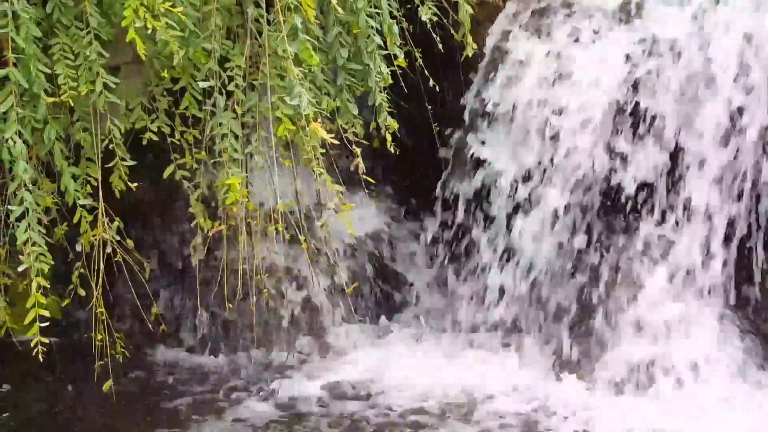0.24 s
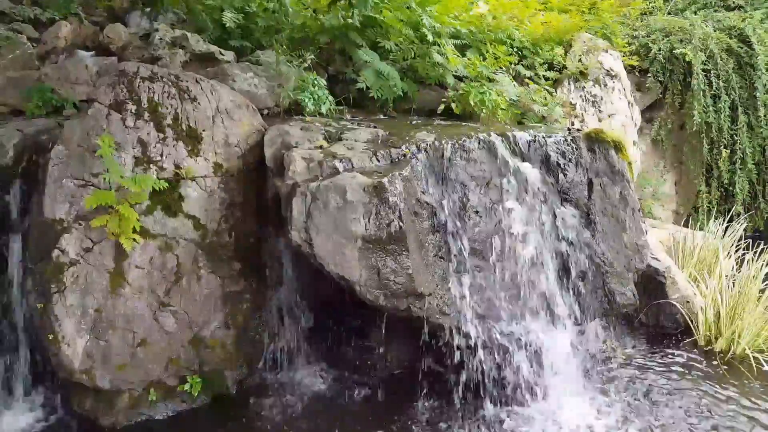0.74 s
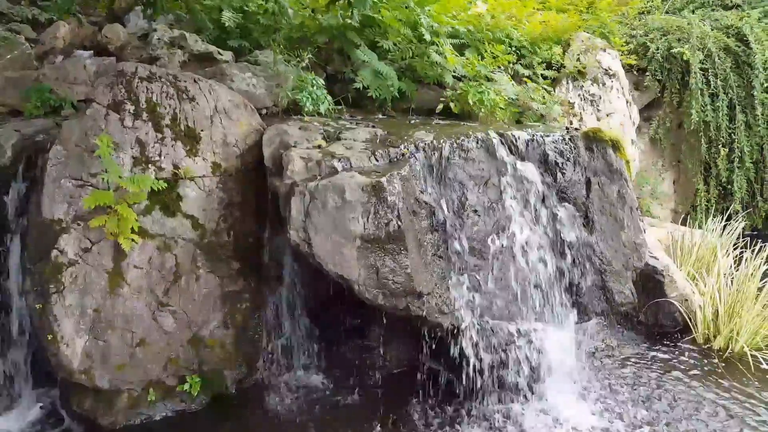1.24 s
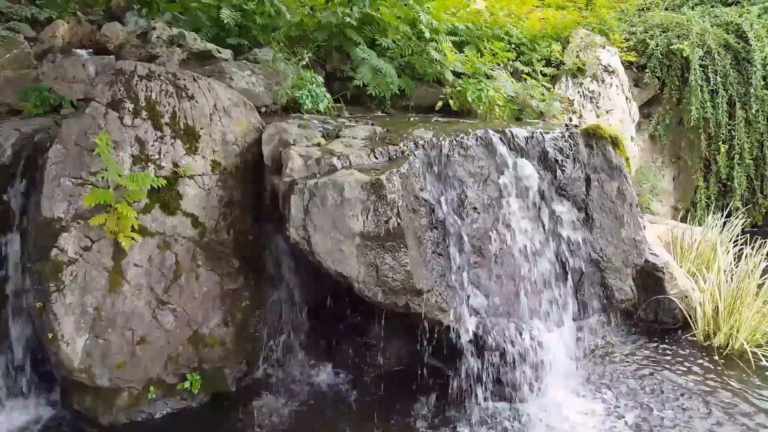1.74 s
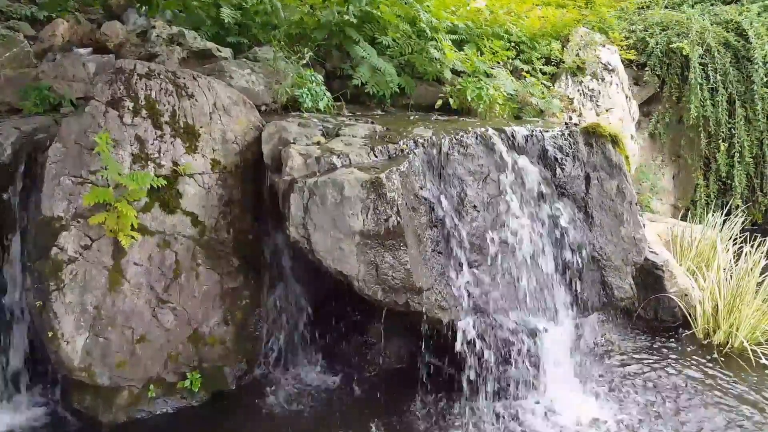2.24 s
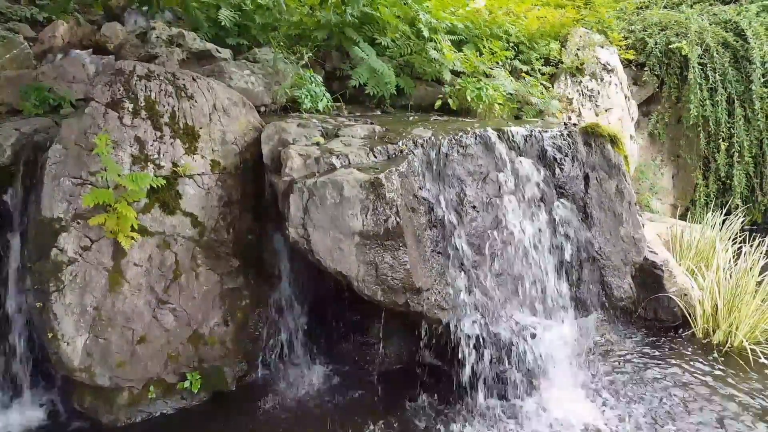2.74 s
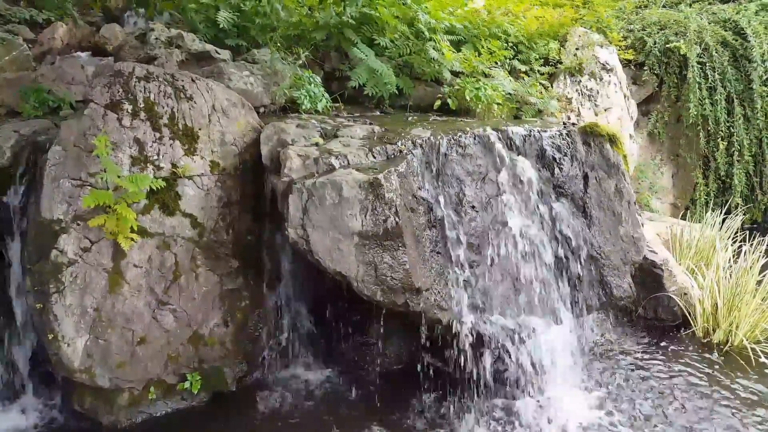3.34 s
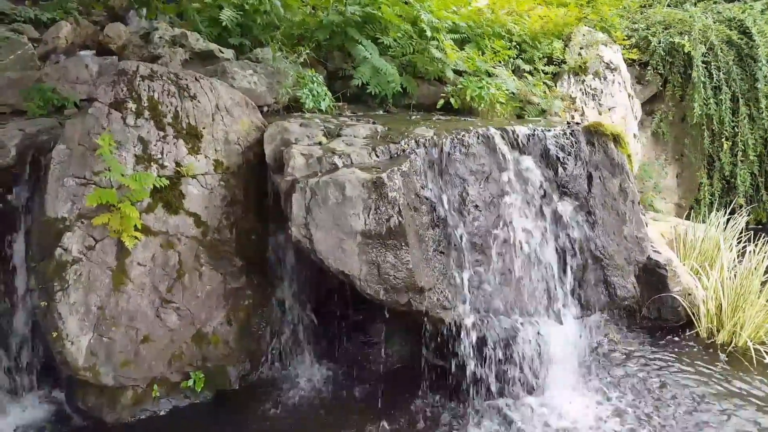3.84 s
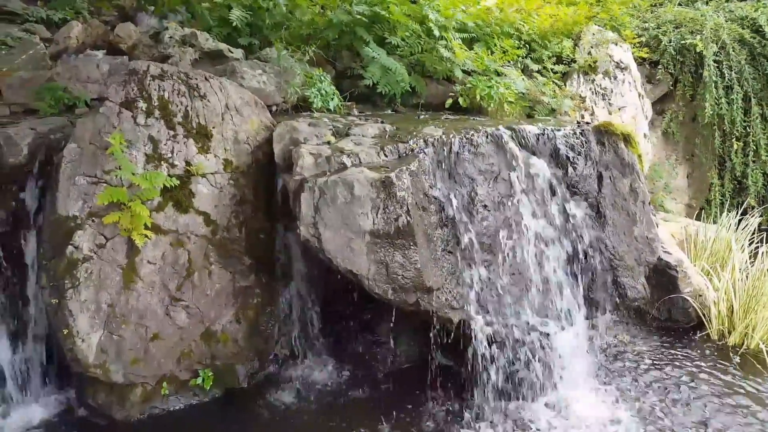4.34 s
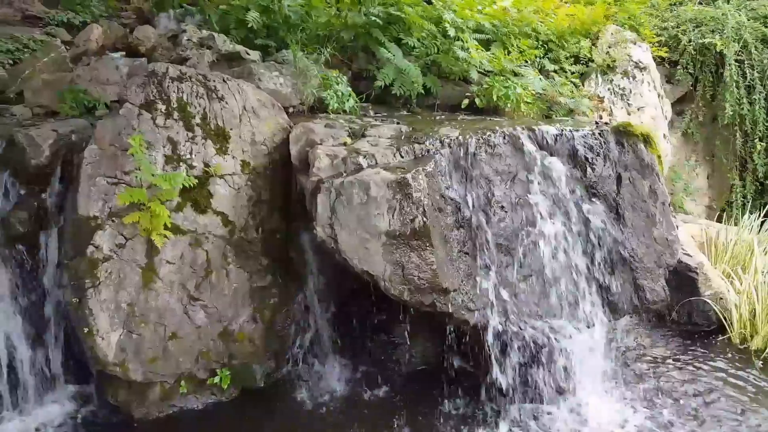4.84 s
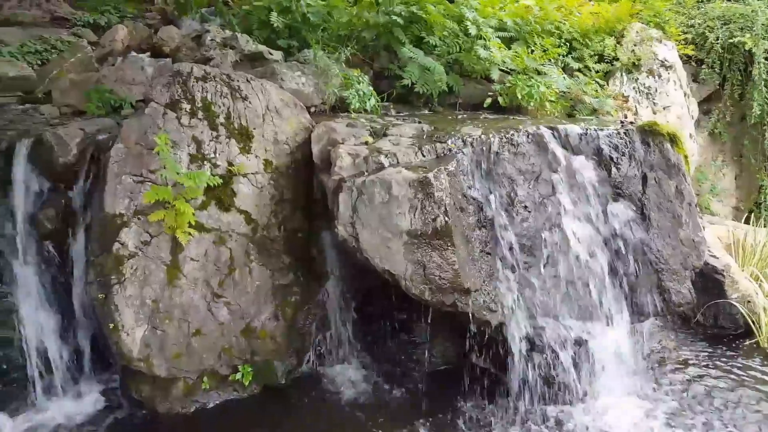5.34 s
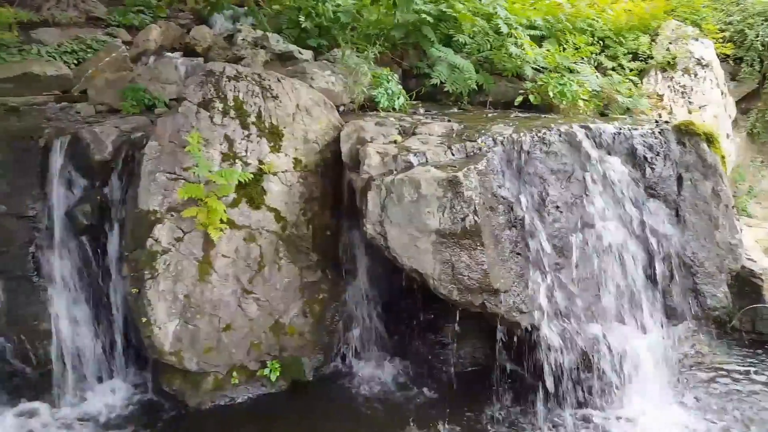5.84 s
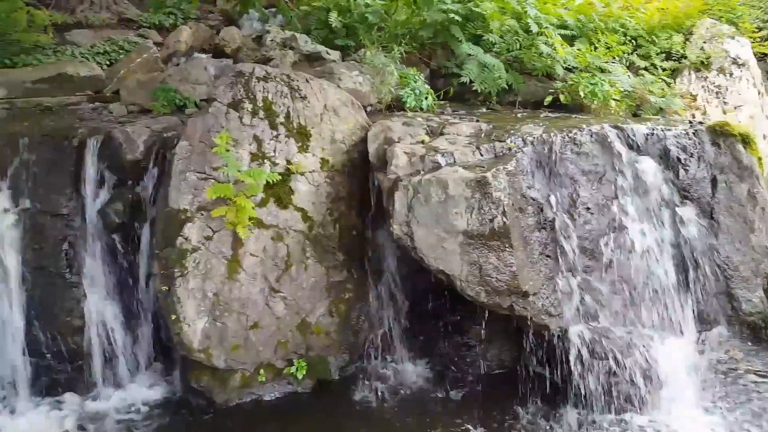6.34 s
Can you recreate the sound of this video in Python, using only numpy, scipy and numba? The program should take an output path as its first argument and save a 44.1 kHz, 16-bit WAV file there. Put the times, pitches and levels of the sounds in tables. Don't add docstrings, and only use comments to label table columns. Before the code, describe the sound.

Two small waterfalls follow one another outdoors. First a dense, bubbling rush fades down and stops; a tiny gap of complete silence follows. Then a sheet of water off a ledge enters at full strength and continues almost evenly to the end, its low plunge lumpy, its mid gurgles swelling, its spray hissing. Spaced stereo microphones give a broad image, brighter toward the left, with a dulled topmost treble.

```python
import sys
import numpy as np
from scipy import signal
from scipy.fft import rfft, irfft, next_fast_len
from scipy.io import wavfile
from numba import njit

SR = 44100
rng = np.random.default_rng(int(sys.argv[2]) if len(sys.argv) > 2 else 0)


def field_ratio(decibels):
    return 10 ** (np.asarray(decibels, dtype=float) / 20)


def digitize_waveform(pressure):
    field = np.atleast_2d(pressure).T
    bounded = np.clip(field, -1, 1)
    quanta = np.round(bounded * 32767).astype(np.int16)
    wavfile.write(sys.argv[1], SR, quanta)


N = 290178

# (chute stops [s], ledge starts [s])
GAP_S = (.4893, .6207)


def ledge():
    # (time [s], level [dB])
    sheet_force = [(0.63, -30), (0.78, -25), (0.94, -23.5), (0.96, -27), (1.89, -26.5), (2.0, -25),
                   (4.56, -25.5), (4.59, -26), (4.82, -25), (4.99, -27.5), (5.02, -25), (6.35, -25.5),
                   (6.53, -24), (6.58, -25.5)]
    # (frequency [Hz], level [dB per Hz], left-right [dB])
    ledge_colour = [(25, -31, -5), (60, -7.5, 0.5), (136, -1.5, -0.5), (273, 1.5, 0.5), (305, -2, -2),
                    (496, -3, -0.5), (604, 0, 2.5), (740, -0.05, -0.6), (1610, 1.13, 2.5), (3770, -2, 7),
                    (5800, -6, -0.5), (8900, -6.5, 5.5), (10600, -9, 0.5), (12100, -7, -2)]
    # (frequency [Hz], share heard alike [0-1], left leads [rad])
    ledge_ports = [(25, .4, 0), (90, .56, .15), (255, .93, .21), (330, .87, .35), (450, .71, 1.25),
                   (600, .66, .68), (800, .64, 1.08), (1000, .5, 2), (1400, .52, 3.25), (1750, .36, 4.35),
                   (2100, .33, 5.65), (2600, .2, 6.9), (3600, .14, 10.5), (6300, .04, 17)]
    # (time [s], half length [s], level [dB])
    slugs = [
        (0.81, .04, 0),
        (1.17, 0.033, 3),
        (1.4, 0.077, 0),
        (2.9, 0.076, -1),
        (3.88, 0.057, 1.5),
        (4.82, .1, -2.5),
        (5.1, 0.13, 2),
        (5.9, 0.1, -1.5),
        (6.35, 0.053, 0),
    ]
    # (time [s], half length [s], level [dB])
    gurgle_swells = [
        (0.9, .04, 2),
        (1.11, .04, 2.5),
        (1.82, 0.047, 3),
        (2.4, 0.092, -0.5),
        (2.82, 0.054, -2.5),
        (3.1, 0.074, 2),
        (3.4, .15, 2.5),
        (4.1, 0.23, 2),
        (5.1, .2, -1.5),
        (5.65, .1, 0.5),
    ]
    # (time [s], half length [s], level [dB])
    splash_surges = [
        (0.626, .005, 4),
        (0.82, 0.069, 2.5),
        (1.14, .02, 2.5),
        (1.25, 0.055, 2.5),
        (1.45, .06, -0.5),
        (1.72, .03, 1),
        (2.75, .1, 1),
        (4.22, 0.057, 1),
        (5.6, 0.046, 0.5),
        (5.8, .06, 0.5),
    ]
    splash_follows, plunge_follows, gurgle_follows = 0.33, 0.39, 0.22
    ledge_db = -16

    size = next_fast_len(N, True)
    force_db, = in_time(sheet_force, size)
    force_db = force_db - force_db.mean()
    plunge_db = (plunge_follows - splash_follows) * force_db + swells(slugs, size)
    gurgle_db = (gurgle_follows - splash_follows) * force_db + swells(gurgle_swells, size)
    slap_db = swells(splash_surges, size)
    spray_db = (1 - splash_follows) * force_db
    water = fall(size, ledge_colour, ledge_ports, (plunge_db, gurgle_db, slap_db, spray_db),
                 bubble_share=0.22, gurgle_share=0.3, surge_db=-0.08, patch_db=0.1447, flicker_db=0.5)
    opening = np.clip((np.arange(size) / SR - GAP_S[1]) / 0.0006, 0, 1)
    return (opening * field_ratio(ledge_db + splash_follows * force_db) * water)[:, :N]


def chute():
    # (time [s], level [dB])
    rush_level = [
        (0.0, -27.5),
        (0.108, -26.5),
        (0.222, -31),
        (0.485, -39),
    ]
    # (frequency [Hz], level [dB per Hz], left-right [dB])
    chute_colour = [(25, -21, 0), (70, -6, 1.5), (150, -8, 0.5), (300, -5, -3), (385, -9.5, 1),
                    (650, -2, -1), (890, -4.5, 3), (1290, -0.5, 3), (2200, -1.5, 5.5), (3320, -3, 6),
                    (4830, -6.5, 1), (9200, -11, 2.5), (10200, -15, 2), (12300, -9, -2)]
    # (frequency [Hz], share heard alike [0-1], left leads [rad])
    chute_ports = [(25, .95, 0), (90, .98, 0), (300, .97, .2), (390, .8, .7), (650, .82, .45),
                   (900, .65, 1.2), (1300, .35, 1.7), (2200, .28, .6), (3300, .15, 3), (5000, .1, 5),
                   (9000, .05, 6)]

    size = SR // 2 + SR // 10
    rush_db, = in_time(rush_level, size)
    water = fall(size, chute_colour, chute_ports, (0, 0, 0, 0),
                 bubble_share=0.23, gurgle_share=0.17, surge_db=-2.0, patch_db=0.0, flicker_db=1.3)
    closing = np.clip((GAP_S[0] - np.arange(size) / SR) / 0.002, 0, 1)
    return np.pad(closing * field_ratio(rush_db + 6.0) * water, ((0, 0), (0, N - size)))


def fall(size, colour, likeness, tilt_db, bubble_share, gurgle_share, surge_db, patch_db, flicker_db):
    common, left, right = rfft([froth(size, bubble_share, gurgle_share) for part in range(3)])
    hz = np.arange(len(common)) * SR / size
    left_right = np.array([[1], [-1]])
    level_db, pan_db = at_hz(colour, hz)
    alike, lead = np.clip(at_hz(likeness, hz), 0, [[1], [np.inf]])
    shared = np.sqrt(alike) * common * np.exp(0.5j * lead * left_right)
    ports = shared + np.sqrt(1 - alike) * np.array([left, right])
    ports = ports * field_ratio(level_db + pan_db / 2 * left_right)

    centres = np.arange(4.5, 14.5, 0.5)
    surge = drift(4.1, size, count=1)[0]
    patches = drift(5.2, size, count=len(centres) + 1)
    flicker = drift(20.0, size, count=len(centres))
    plunge_db, gurgle_db, slap_db, spray_db = tilt_db
    out = 0
    for k, octave in enumerate(centres):
        away = np.clip((np.log2(np.clip(hz, 23, None)) - octave) * 2, -1, 1)
        band = irfft(ports * np.cos(away * np.pi / 2) ** 2, size)
        low = np.clip((np.log2(420.0) - octave) * 1.6, 0, 1)
        middle = np.clip(1.5 - abs(octave - np.log2(730.0)) * 2, 0, 1)
        bright = np.clip(1.5 - abs(octave - np.log2(2200.0)) * 2, 0, 1)
        high = np.clip((octave - np.log2(4000.0)) * 1.8, 0, 1)
        steered_db = low * plunge_db + middle * gurgle_db + bright * slap_db + high * spray_db
        lumpy = 1 + 1.9 * low
        patchy_db = patch_db * (patches[k] + patches[k + 1]) + flicker_db * flicker[k]
        out = out + band * field_ratio(steered_db + surge_db * surge + lumpy * patchy_db)
    return rms_one(out)


def froth(size, bubble_share, gurgle_share):
    rush = rng.standard_normal(size)
    fizz = bubbles(size, per_s=9000, low_hz=116.0, high_hz=15800, cycles=10.6, spread_db=2.5)
    gurgle = bubbles(size, per_s=500, low_hz=152.2, high_hz=3984, cycles=35.0, spread_db=3.5)
    shares = np.clip([1 - bubble_share, bubble_share, gurgle_share], 0, 1)
    return np.sqrt(shares) @ [rush, fizz, gurgle]


def bubbles(size, per_s, low_hz, high_hz, cycles, spread_db):
    when, pitch, strength, sign = rng.random((int(size / SR * per_s), 4)).T
    hz = low_hz + (high_hz - low_hz) * pitch
    loudness = field_ratio(-spread_db * np.log(strength + 0.024))
    height = loudness * np.sign(sign - 0.5) * np.sqrt(hz)
    cloud = ring_up((when * size).astype(np.int64), hz, height, cycles, 0.13, size, SR)
    return rms_one(cloud) * np.sqrt((high_hz - low_hz) / (SR / 2))


@njit
def ring_up(at, hz, height, cycles, rise, size, rate):
    out = np.zeros(size)
    for k in range(len(at)):
        length = cycles * rate / hz[k]
        for i in range(min(int(length), size - at[k])):
            u = i / length
            ring = np.sin(2 * np.pi * cycles * u * (1 + rise * u))
            out[at[k] + i] += height[k] * np.exp(-6.9 * u) * ring
    return out


def swells(rows, size):
    t = np.arange(0, size, 64) / SR
    bells = sum(db * np.exp(-0.5 * ((t - s) / half_s) ** 2) for s, half_s, db in rows)
    return np.interp(np.arange(size) / SR, t, bells)


def drift(rate, size, count):
    r = np.exp(-2 * np.pi * rate * 64 / SR)
    noise = rng.standard_normal((count, size // 64 + 1002))
    slow = signal.lfilter([1], [1, -2 * r, r * r], noise)[:, 1000:]
    return np.array([np.interp(np.arange(size) / 64, np.arange(len(v)), rms_one(v)) for v in slow])


def in_time(rows, size):
    s, *columns = np.transpose(rows)
    return [np.interp(np.arange(size) / SR, s, c) for c in columns]


def at_hz(rows, hz):
    f, *columns = np.transpose(rows)
    return [np.interp(np.log(hz + 1), np.log(f), c) for c in columns]


def rms_one(x):
    return x / np.sqrt(np.mean(x ** 2) + 1e-20)


def scene():
    return chute() + ledge()


def top_cut(x):
    return signal.sosfilt(signal.butter(12, 15600, fs=SR, output="sos"), x)


def record(dry):
    cutoff_hz, top_band_hz = 15500, 15050
    top_band_kept, top_band_steady_s = 0.13, 0.73
    weak_low_hz, weak_high_hz = 9900, 10650
    weak_lost_chute, weak_lost_ledge = 0.3, 0.03

    hz = np.arange(N // 2 + 1) * SR / N
    rounded = 1.137 * np.tanh(dry / 1.263)
    droop_db = -2.0 * np.clip((hz - 13000) / 2000, 0, 1)
    spectrum = rfft(rounded) * field_ratio(droop_db) * (hz < cutoff_hz)
    main_band = irfft(spectrum * (hz <= top_band_hz), N)
    moments = np.arange(225, N + 1024, 1024)

    runs = drift(18.0, N + 1024, count=1)[0][moments - 225]
    kept = (runs > np.quantile(runs, 1 - top_band_kept)) | (moments < top_band_steady_s * SR)
    top_band = irfft(spectrum * (hz > top_band_hz), N) * np.interp(np.arange(N), moments, kept)

    lost_share = np.where(moments < GAP_S[0] * SR, weak_lost_chute, weak_lost_ledge)
    lost = rng.random(len(moments)) < lost_share
    weak_band = irfft(spectrum * (hz > weak_low_hz) * (hz < weak_high_hz), N)
    lost_part = weak_band * np.clip(1.5 * np.interp(np.arange(N), moments, lost), 0, 1)

    sounding = np.abs(dry) > 0
    return top_cut((main_band + top_band - lost_part) * sounding)


dry = scene()
out = record(dry)
digitize_waveform(out)
```